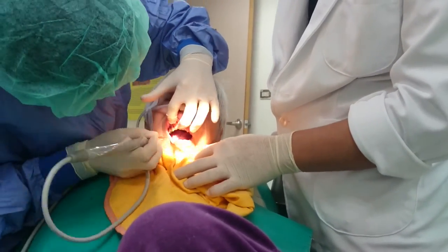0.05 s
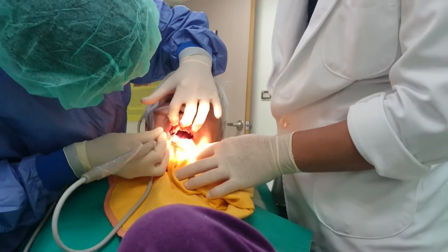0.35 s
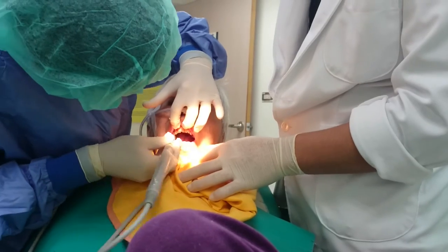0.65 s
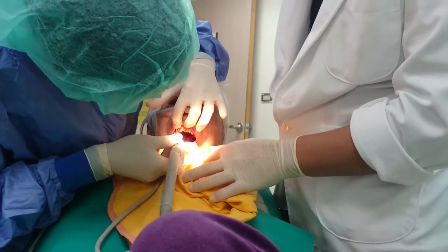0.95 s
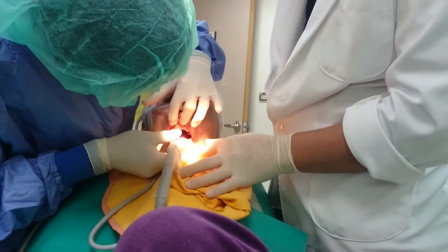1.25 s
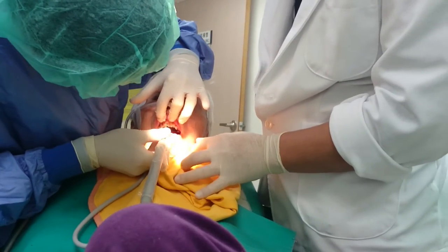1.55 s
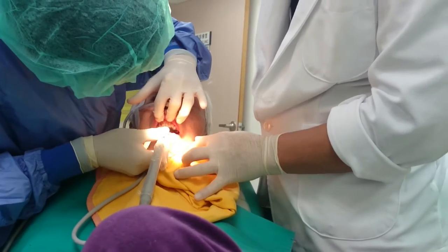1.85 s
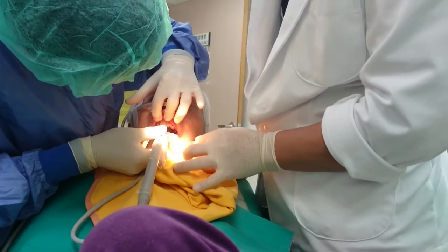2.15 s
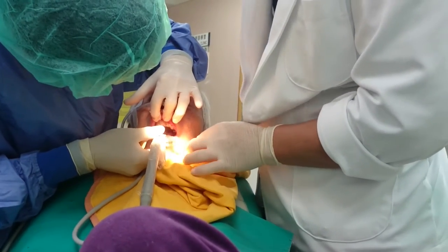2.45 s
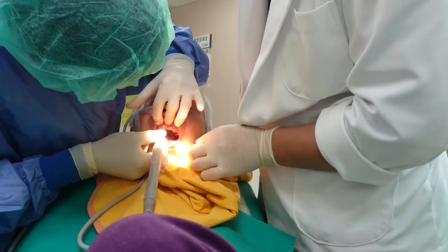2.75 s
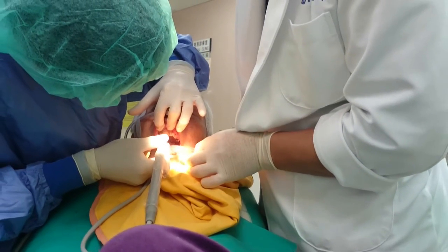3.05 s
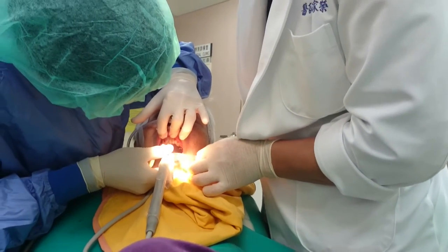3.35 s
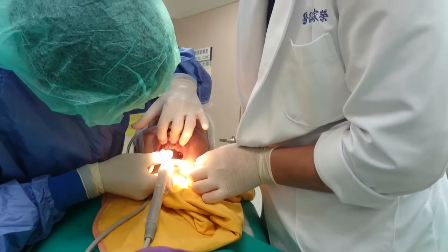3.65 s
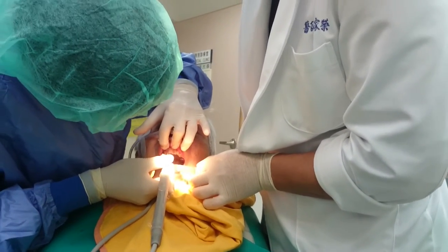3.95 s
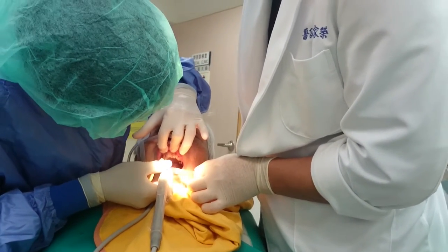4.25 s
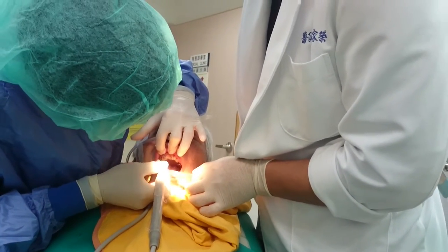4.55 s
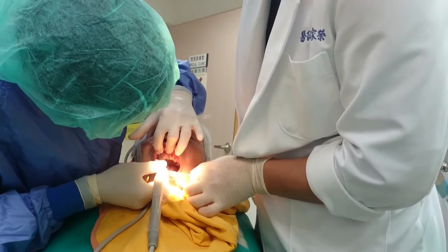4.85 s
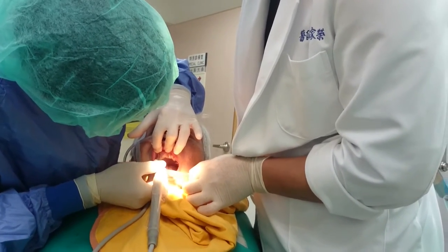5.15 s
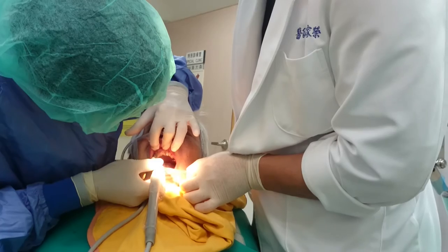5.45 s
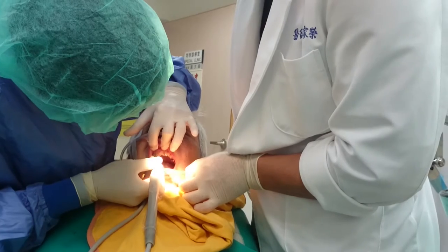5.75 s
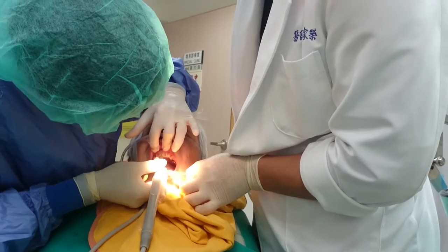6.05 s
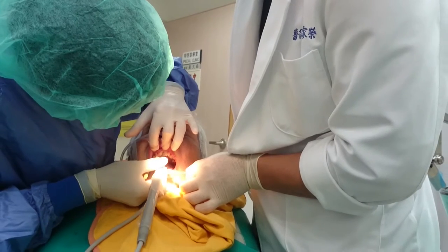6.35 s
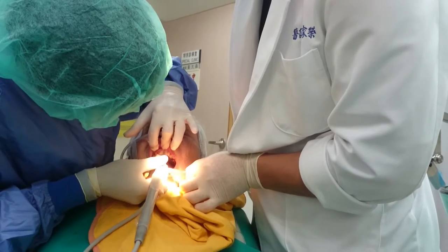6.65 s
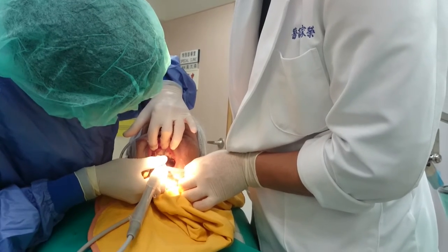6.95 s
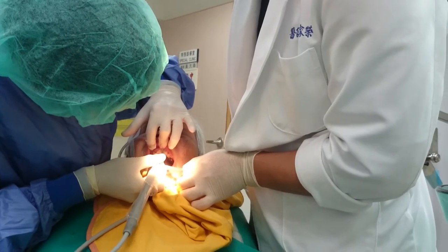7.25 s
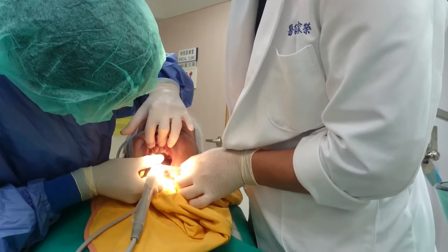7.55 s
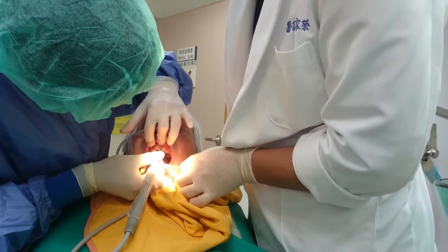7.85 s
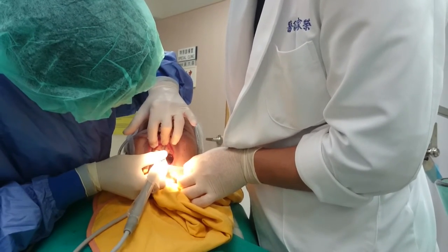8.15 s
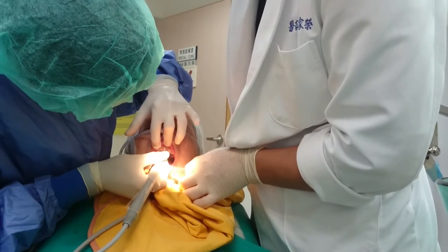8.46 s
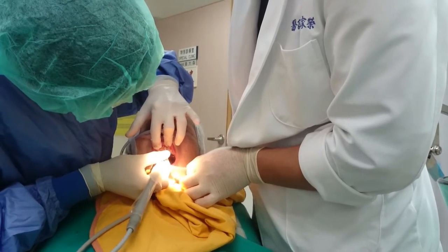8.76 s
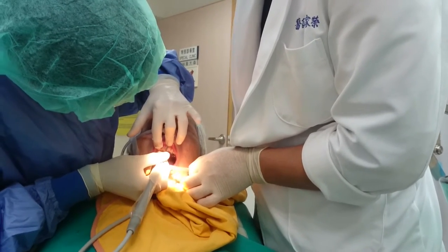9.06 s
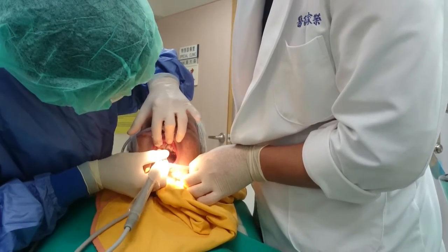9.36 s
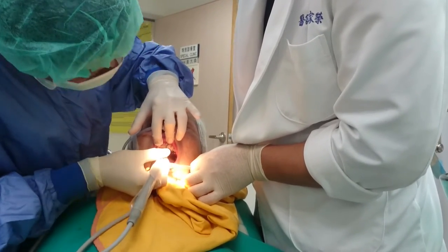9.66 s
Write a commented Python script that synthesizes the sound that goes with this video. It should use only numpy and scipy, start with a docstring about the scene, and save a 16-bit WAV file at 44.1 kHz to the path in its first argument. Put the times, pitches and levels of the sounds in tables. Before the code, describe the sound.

A dental suction tube hisses and whistles on its own at first. Then a very high scaler whine cuts in with hissing spray, broken by short scrapes and squeaks on the teeth. As water pools in the mouth, the tube gurgles, fizzes and slurps, carrying on when the whine cuts off at the very end. The stereo microphone is close to the chair in a small, faintly humming treatment room.

```python
"""An ultrasonic scaler cleaning teeth, close to a stereo microphone in a small dental surgery.
It whines as its tip skips on the teeth, rasps at half its pitch when pressed, squeaks as it slides
and throws off a hissing mist of water. Beside it a suction tube first draws plain air, then slurps
and crackles as the water pools in the mouth. Equipment hums in the room behind."""
import sys
import numpy as np
from scipy import signal
from scipy.fft import rfft, irfft, next_fast_len
from scipy.io import wavfile
from scipy.ndimage import uniform_filter1d, map_coordinates

SR = 44100
rng = np.random.default_rng(int(sys.argv[2]) if len(sys.argv) > 2 else 0)


def unload_wav(signal):
    """Save mono or channel-first audio to the path in sys.argv[1] as 16-bit WAV at rate SR, clipped to [-1, 1]."""
    wavfile.write(
        sys.argv[1],
        SR,
        np.round(np.clip(np.atleast_2d(signal).T, -1, 1) * 32767).astype(np.int16),
    )


N = 437472
TIP_HZ, SCALER_ON_S, SCALER_OFF_S = 11910, 1.66, 9.7
WET_S = 2.83  # water reaches the tube

# The tip pressed on a tooth. Each row: start in seconds, length in seconds, relative level in dB.
SCRAPES = [(1.66, 0.088, -34), (1.76, 0.02, -19), (2.23, 0.021, -23), (2.41, 0.092, -26.8),
           (2.87, .06, -30.5), (3.235, 0.03, -15.5), (3.57, 0.024, -23.5), (3.81, .05, -20),
           (3.94, 0.029, -19.5), (4.02, 0.022, -22), (4.52, 0.049, -25), (4.765, 0.062, -18),
           (5.06, 0.085, -19.5), (5.5, 0.079, -22), (5.705, .04, -20.5), (5.82, 0.033, -23),
           (5.95, 0.038, -21), (6.255, 0.057, -19.5), (6.56, .05, -27.5), (6.935, 0.028, -14),
           (7.001, .007, -14), (7.044, .035, -18.5), (7.22, 0.082, -18.5), (7.54, 0.031, -19),
           (7.71, 0.057, -23.5), (7.96, 0.057, -18.5), (8.09, 0.03, -21.5), (8.42, 0.044, -18),
           (8.458, 0.06, -17), (8.63, 0.089, -19), (8.83, 0.038, -22), (9.0, 0.068, -20.5),
           (9.09, 0.024, -19.5), (9.22, .07, -27), (9.332, 0.041, -24), (9.49, .05, -25), (9.8, .06, -35)]
# The tip sliding. Each row: start and length in seconds, first, middle and last pitch in Hz,
# relative levels of the squeak and of its sidebands in dB.
SLIDES = [(3.953, 0.078, 6150, 6350, 6110, -22, -29), (4.118, 0.087, 6250, 6450, 6100, -24, -28),
          (4.268, 0.074, 6650, 6380, 5900, -23, -25), (4.363, 0.057, 6600, 6270, 6100, -27, -35),
          (5.445, 0.08, 6500, 6320, 6000, -23, -32), (5.687, 0.04, 6600, 6400, 6300, -23.5, -31),
          (5.819, 0.048, 6600, 6120, 6000, -22, -40), (6.309, 0.06, 6400, 6600, 6300, -31, -34.5),
          (6.564, 0.064, 6500, 6320, 6100, -28, -32), (6.923, 0.017, 6450, 6440, 6450, -30.5, -15),
          (6.956, 0.061, 6250, 6550, 6040, -24, -29), (7.032, 0.023, 6600, 6430, 6160, -24, -27.6),
          (7.912, 0.041, 6200, 6500, 6600, -28.5, -25), (8.02, 0.073, 6850, 6460, 6470, -22, -33),
          (9.071, 0.053, 6650, 6240, 6240, -21.5, -27), (9.22, 0.061, 5300, 5460, 5620, -20.5, -42)]


def amp(db):
    """Decibels to gain."""
    return 10 ** (np.asarray(db) / 20)


def unit(x):
    """Scale to rms 1."""
    return x / np.sqrt(np.mean(np.abs(x) ** 2) + 1e-20)


def clock():
    """The time of each sample in seconds."""
    return np.arange(N) / SR


def elapsed(start):
    """Seconds since a moment, 0 before it."""
    return np.maximum(clock() - start, 0)


def along(points, hz):
    """(Hz, value) points read on a log axis."""
    knots_hz, values = np.transpose(points)
    return np.interp(np.log(hz + 1), np.log(knots_hz + 1), values)


def curves(rows):
    """One value per sample for each column after the time."""
    times, *columns = np.transpose(rows)
    return [np.interp(clock(), times, column) for column in columns]


def gate(start, end, edge):
    """1 between two times, with ramps of edge seconds."""
    t = clock()
    return np.clip(np.minimum(t - start, end - t) / edge + .5, 0, 1)


def wobble(rate):
    """A smooth random curve, rate knots a second."""
    return map_coordinates(rng.standard_normal(int(N * rate / SR) + 4), [clock() * rate])


def noise():
    """Two unrelated white noises."""
    return rng.standard_normal((2, N))


def filtered(x, response):
    """x times a response of frequency."""
    size = next_fast_len(N + 8192)
    return irfft(rfft(x, size) * response(np.fft.rfftfreq(size, 1 / SR)), size)[..., :N]


def placed(x, pan_db):
    """Lean a sound to the left by pan_db, keeping its power."""
    left, right = np.broadcast_to(x, (2, N))
    g = amp(pan_db)
    return np.array([g * left, right]) * np.sqrt(2 / (1 + g * g))


def akin(pair, coherence):
    """Blend two unrelated signals so that left and right are partly alike."""
    angle = np.arccos(np.clip(coherence, 0, 1)) / 2
    mid, side = np.cos(angle) * pair[0], np.sin(angle) * pair[1]
    return np.array([mid + side, mid - side])


def coloured(pair, colour):
    """Two unrelated signals become a stereo sound of rms 1 with a spectrum of (Hz, dB) points."""
    # Likeness of left and right at the microphone. Each row: frequency in Hz, coherence.
    likeness = [(60, 0.99), (600, .8), (1400, 0.15), (3000, 0.33), (4500, 0.21), (6000, 0.36), (7500, .25),
                (10000, 0.39), (12000, 0.26), (15000, 0.32)]

    def gains(hz):
        angle = np.arccos(np.clip(along(likeness, hz), -1, 1)) / 2
        return amp(along(colour, hz)) * [np.cos(angle), np.sin(angle)]
    mid, side = filtered(pair, gains)
    return unit(np.array([mid + side, mid - side]))


def leaned(x):
    """The hiss leans left or right by frequency, mostly right near 6, 7 and 15 kHz."""
    # Balance at the microphone. Each row: frequency in Hz, left over right in dB.
    balance = [(2000, -1), (4500, 4), (5900, -13), (7300, -9), (9000, -1), (10200, -5.5), (11400, 2),
               (12600, -2), (13800, -10.5), (15600, -24)]

    def gains(hz):
        g = amp(along(balance, hz))
        return np.array([g, np.ones_like(g)]) * np.sqrt(2 / (1 + g * g))
    return filtered(x, gains)


def ringing(x, hz, width_hz):
    """x through a steep (doubled) resonance whose centre may move; rms 1."""
    carrier = np.exp(2j * np.pi * np.cumsum(np.broadcast_to(hz, N)) / SR)
    pole = np.exp(-np.pi * width_hz / SR)
    return unit((signal.lfilter([1], np.poly([pole, pole]), x / carrier) * carrier).real)


def hollowed(x, hz, width_hz, depth):
    """x with a moving band cancelled, as by the reflection from a cavity."""
    carrier = np.exp(2j * np.pi * np.cumsum(hz) / SR)
    pole = np.exp(-np.pi * width_hz / SR)
    band = signal.lfilter([1 - pole], [1, -pole], x / carrier) * carrier
    return x - depth * 2 * band.real


def spatter(rate, life_s, spread_db, share):
    """Bursting droplets: brief puffs of uneven size, taking a share of the power of a steady rush."""
    bursts = (rng.random(N) < rate / SR) * amp(spread_db * np.clip(rng.standard_normal(N), -2, 2)) ** 2
    power = signal.lfilter([1], [1, -np.exp(-1 / (life_s * SR))], bursts)
    return noise() * np.sqrt(1 - share + share * power / power.mean())


def walls(x, t60):
    """The short diffuse answer of the surgery's walls, different left and right."""
    t = np.arange(SR // 3) / SR
    tail = rng.standard_normal((2, len(t))) * amp(-60 * t / t60)
    return signal.fftconvolve(x[None], tail / np.linalg.norm(tail[0]), axes=1)[:, :N]


def surgery():
    """Room tone: a wavering equipment hum, low ventilation noise and one soft bump."""
    # Equipment hum. Each row: frequency in Hz, relative level in dB.
    partials = [(59.5, -65.5), (120, -86), (198, -74.5), (310, -71.5), (576, -71)]
    # Ventilation noise. Each row: frequency in Hz, relative level in dB.
    vent_colour = [(20, 8), (60, -11), (130, 9), (300, -4), (700, -30), (2000, -7)]
    t = clock()
    hum = 0
    for hz, db in partials:
        peak = amp(db + 2.4 * wobble(8)) * np.sqrt(2)
        hum += peak * np.sin(2 * np.pi * hz * (t + .0004 * wobble(14)))
    # turned down about 5 dB by the recorder as the scaler starts
    hum *= amp(5.3 * gate(-1, 1.78, 0.079) - 1.0)
    vent = amp(-60.5) * coloured(noise(), vent_colour)
    bump_time = (t - 4.492) / .003
    bump = amp(-33.5) * bump_time * np.exp(-bump_time ** 2)
    return placed(hum, pan_db=-6) + vent + bump


def suction_air():
    """Dry air hisses and whistles into the tube; the whistles fade once it lies in the wet mouth."""
    # The draw of air. Each row: time in seconds, relative level in dB.
    draw = [(0, -34), (.27, -35), (.52, -37.5), (.8, -36.5), (1.13, -39), (1.27, -36), (1.6, -39)]
    # Its hiss. Each row: frequency in Hz, relative level in dB.
    air_colour = [(120, -17), (250, -20.5), (450, -16.5), (700, -15), (1200, -8.5), (2100, -7), (2800, -8),
                  (3400, -3), (5200, -9), (6400, 5.5), (8000, -5), (9800, -17), (11600, -8), (13400, -6.5),
                  (15600, 0.5)]
    # Tube resonances. Each row: centre and width in Hz, relative level and left over right in dB.
    tube_modes = [(1284, 41, -22, -4), (1540, 58, -23, 17), (1770, 94, -29.5, -11), (3083, 39, -24.5, -9),
                  (3438, 85, -10, -0.5), (4050, 560, -8.5, 4), (4940, 380, -10.5, 2), (5870, 520, 1, -14),
                  (7220, 940, -8.5, -25)]
    air_db, = curves(draw)
    flow = spatter(rate=400, life_s=0.004, spread_db=5, share=0.3)
    hiss = leaned(coloured(flow, air_colour)) * amp(air_db + 5.5 - 3.3 * gate(1.95, np.inf, .2))
    # the upper resonances rise as the tube is pushed closer to the cheek
    rise = 0.037 * (np.clip(clock() / .9, 0, 1) - .5)
    whistles = 0
    for hz, width_hz, db, pan_db in tube_modes:
        centre_hz = hz * (1 + rise * (hz > 4500))
        level = amp(db + 0.67 * wobble(5.14))
        whistles += placed(level * ringing(akin(noise(), coherence=0.3), centre_hz, width_hz), pan_db)
    fade_db = 7 * gate(1.72, np.inf, .15)
    return hiss + whistles * amp(air_db + 3.0 - fade_db)


def gurgle(hollow_hz):
    """Churning water rings the mouth, which hoots when the gap between tube and cheek is narrow."""
    # The churn. Each row: frequency in Hz, relative level in dB.
    churn_colour = [(100, -24), (300, -11.5), (470, -15.5), (560, -1.5), (700, -1.5), (830, -3.5),
                    (1420, -4), (1560, 4.5), (1740, 4.5), (1850, -5), (2100, -2), (2650, -14), (3300, -1),
                    (4000, 4), (5000, -16.5)]
    # Narrow resonances of mouth and tube. Each row: centre in Hz, width in Hz, boost in dB.
    modes = [(410, 24, 6.5), (702, 23, 4.5), (890, 38, 2), (1050, 28, 5), (1514, 32, 5), (1794, 42, 4),
             (1895, 24, 8), (2052, 15, 6.5), (2510, 39, 8.5), (3046, 17, 10), (3430, 52, 11)]

    def resonances(f):
        return amp(sum(db * np.exp(-((f - hz) / width_hz) ** 2) for hz, width_hz, db in modes))
    churn = spatter(rate=240, life_s=0.004, spread_db=-1, share=0.7)
    mouth = unit(filtered(coloured(churn, churn_colour), resonances))
    narrowness = np.interp(hollow_hz, [3240, 4460], [0, 1])  # a narrower gap cancels a higher band
    hoot = ringing(akin(noise(), coherence=0.44), hz=1559, width_hz=77)
    return mouth + narrowness * amp(-10.5) * hoot


def slurp(slurp_db, hollow_hz):
    """Drops fizz and ring the tube's opening, left of centre; the gap beside it shifts like a vowel."""
    # The range in which the gap can ring. Each row: frequency in Hz, relative gain in dB.
    gap_colour = [(2600, -28.5), (3350, -1), (4300, 7), (5000, -28)]
    # The fizz of the drops. Each row: frequency in Hz, relative level in dB.
    fizz_colour = [(7000, -27), (8800, -7), (9600, -7), (10150, 5), (10650, -6), (11400, -11), (12700, -15),
                   (15700, -6.5)]
    drops = spatter(rate=260, life_s=0.0028, spread_db=2.5, share=0.6)
    stream = akin(drops, coherence=0.44)
    opening = ringing(stream, hz=4580, width_hz=500) * amp(slurp_db + 1.5 + 2.6 * wobble(21))
    # the gap rings either side of the cancelled band and partly follows the slurp's swells
    gap = sum(ringing(stream, hollow_hz + offset_hz, width_hz=640) for offset_hz in (-845, 1013))
    gap = unit(filtered(gap, lambda hz: amp(along(gap_colour, hz))))
    gap *= amp(-33 + 0.39 * (slurp_db - slurp_db.mean()))
    fizz = coloured(drops, fizz_colour) * amp(slurp_db - 3.0)
    return placed(opening + gap, pan_db=6.5) + placed(fizz, pan_db=4.0)


def suction_water(hollow_hz):
    """Water enters the tube in uneven gulps and tears into drops, gurgling and slurping."""
    # Water in the tube. Each row: time in seconds, relative levels of gurgle and slurp in dB.
    water = [(2.88, -42, -42), (3.35, -41.5, -41), (3.37, -38.5, -35), (3.7, -39, -26), (3.74, -39, -32.5),
             (4.11, -41, -34), (5.25, -40, -30), (5.82, -38, -26), (7.12, -41, -30.5), (7.55, -40, -23.5),
             (7.82, -39, -30.5), (7.86, -38.5, -28.5), (8.57, -42, -30.5), (9.92, -39.5, -32)]
    gulps_db = wobble(14)
    gurgle_db, slurp_db = np.array(curves(water)) + gulps_db
    mouth = placed(gurgle(hollow_hz) * amp(gurgle_db + 6.0), pan_db=-1.0)
    return gate(WET_S, np.inf, 0.1) * (mouth + slurp(slurp_db, hollow_hz))


def sizzle():
    """Water sizzles between tip and tooth, off to the right, swelling ever faster as it pools."""
    # The sizzle. Each row: frequency in Hz, relative level in dB.
    sizzle_colour = [(3000, -39), (4900, -10), (5500, -3), (5930, 6), (6300, -6.5), (6800, -9.5),
                     (7800, -17), (9000, -19.5)]
    pooled = elapsed(WET_S) / (N / SR - WET_S)
    level_db = -27.5 + 7 * pooled ** 3.35 + 2.16 * wobble(25) + 2.4 * wobble(6)
    drops = coloured(spatter(rate=200, life_s=0.0016, spread_db=6.5, share=0.38), sizzle_colour)
    return placed(drops * amp(level_db) * gate(WET_S, np.inf, .033), pan_db=-10.0)


def mist(press, lift):
    """The running tip shatters its cooling water into a fine hiss, more of it when pressed on a tooth."""
    # Water thrown off the tip. Each row: time in seconds, relative level in dB.
    spray = [(1.7, -29.5), (2.48, -32), (3.82, -26), (4.26, -31.5), (4.73, -26.5), (8.07, -29),
             (9.7, -25.5)]
    # Its hiss. Each row: frequency in Hz, relative level in dB.
    mist_colour = [(1500, -34.5), (3500, -10), (4500, -6), (6000, -0.5), (7200, -5), (8700, -7.5),
                   (10050, 0.5), (10650, -4.5), (11400, 2.5), (12200, -4.5), (12900, 5), (13400, -5.5),
                   (13800, 3.5), (14500, -1.5), (15600, 6.5)]
    run_on_s, fade_db_per_s = 0.041, 109  # the water outlasts the tip a little
    fade_db = fade_db_per_s * elapsed(SCALER_OFF_S + run_on_s)
    mist_db, = curves(spray)
    mist_db += 0.5 * press - 1.5 * lift - fade_db + 1.2 * wobble(20)
    droplets = coloured(spatter(rate=1200, life_s=0.00088, spread_db=-1.0, share=0.14), mist_colour)
    return leaned(droplets * amp(mist_db + 10.0) * gate(SCALER_ON_S, np.inf, 0.0068))


def pressure():
    """How hard the tip presses, and how far it lifts after a scrape or while it slides (1 = full)."""
    full_press_db, lift_s, slide_lift = -20.5, 0.095, 0.41
    press, lift = 0, 0
    for start, length, db in SCRAPES:
        force = amp(db - full_press_db)
        end = start + length
        press = np.maximum(press, force * gate(start, end, .011))
        lift = np.maximum(lift, force * gate(end, end + lift_s, .016))
    for start, length, *_ in SLIDES:
        lift = np.maximum(lift, slide_lift * gate(start, start + length, .015))
    return press, lift * np.clip(1 - press, 0, 1)


def skipping(rate, blur_s):
    """Complex swing of the tip: each skip on the tooth throws its phase by about half a cycle."""
    skips = rng.random(N) < rate / SR
    phase = np.cumsum(skips * (np.pi + 0.67 * rng.standard_normal(N)))
    pole = np.exp(-1 / (blur_s * SR))
    return unit(signal.lfilter([1 - pole], [1, -pole], np.exp(1j * phase)))


def squeaks():
    """Sliding detunes the tip's half-pitch tone; twice the offset sounds on both sides of the whine."""
    tracks = np.zeros((2, N + SR))
    for start, length, first_hz, middle_hz, last_hz, squeak_db, side_db in SLIDES:
        progress = np.linspace(0, 1, max(int(length * SR), 8))
        onset, n = int(start * SR), len(progress)
        hz = np.polyval(np.polyfit([0, .5, 1], [first_hz, middle_hz, last_hz], 2), progress)
        jitter = unit(uniform_filter1d(rng.standard_normal(SR // 4), size=60))[:n]
        half_phase = 2 * np.pi * np.cumsum(hz + 85 * jitter) / SR
        mirror_phase = 2 * np.pi * TIP_HZ * np.arange(n) / SR - half_phase
        squeak = amp(squeak_db) * (np.sin(half_phase) + amp(-18) * np.sin(mirror_phase))
        sidebands = amp(side_db) * (np.sin(2 * half_phase) + np.sin(2 * mirror_phase))
        envelope = np.abs(np.sin(np.pi * progress)) ** 0.25
        tracks[:, onset:onset + n] += np.array([squeak, sidebands]) * envelope
    squeak, sidebands = tracks[:, :N]
    echo = amp(-9) * walls(squeak + sidebands, t60=.15)
    return placed(amp(3.0) * squeak, pan_db=-17.0) + placed(amp(1.5) * sidebands, pan_db=-7) + echo


def rasp():
    """Pressed hard, the tip strikes on every other swing: a rough tone an octave down, and a rattle."""
    # The rattle on the tooth. Each row: frequency in Hz, relative level in dB.
    rattle_colour = [(1000, -70), (3000, -46), (4500, -20), (5300, -6), (5750, -0.5), (5960, 6),
                     (6200, -5.5), (6600, -17), (8000, -55.5)]
    level = sum(amp(db) * gate(start, start + length, 0.025) for start, length, db in SCRAPES)
    half_tone = (skipping(rate=330, blur_s=0.00065) * np.exp(1j * np.pi * TIP_HZ * clock())).real
    rattle = coloured(spatter(rate=300, life_s=0.0025, spread_db=4.5, share=0.82), rattle_colour)
    return placed(level * (amp(-2.5) * rattle + amp(1.2) * half_tone), pan_db=-10.5)


def tick():
    """The tip ticks as it first starts to swing."""
    burst = coloured(noise(), [(150, -8.5), (400, -11), (2500, 2), (7000, -1), (14000, -20)])
    return amp(-35.0) * gate(SCALER_ON_S, SCALER_ON_S + 0.019, 0.0033) * burst


def whine(press, lift):
    """The tip's piercing tone, chopped by skips that crowd together at the start and under pressure."""
    # The hand's way round the mouth. Each row: time in seconds, relative level and left over right in dB.
    path = [(1.8, -16.5, -2), (2.04, -19, -5), (2.92, -19.5, -8.5), (3.68, -21.5, 4.5), (3.83, -20, 2),
            (5.26, -23.5, 4), (6.83, -20.5, 4.5), (6.97, -22.5, 1), (7.45, -22.5, 2), (7.67, -20.5, 0),
            (8.76, -24.5, 2.0), (9.02, -21.5, 1.5), (9.66, -24, 2)]
    swing_up_s, run_down_db_per_s = .04, 150
    level_db, pan_db = curves(path)
    level_db += 1.5 * press - 0.5 * lift - run_down_db_per_s * elapsed(SCALER_OFF_S)
    swing_up = 1 - np.exp(-elapsed(SCALER_ON_S) / swing_up_s)
    skips_per_s = 60 + 170 * press + 500 * gate(1.6, 1.79, .06)
    swing = skipping(skips_per_s, blur_s=0.00058) * amp(1.19 * wobble(50) + 1.56 * wobble(600))
    carrier = np.exp(2j * np.pi * TIP_HZ * clock())
    tone = (swing * carrier).real * amp(level_db + 5.0) * swing_up
    # the moving hand shades each side of the microphone in turn
    direct = np.array([tone * amp(1.5 * wobble(13)), tone * amp(1.1 * wobble(22))])
    return placed(direct, pan_db) + amp(-15) * walls(tone, t60=.22)


def scene():
    """At the chair, scaler and suction work side by side; the mouth's cavity hollows out their hiss."""
    # The band cancelled by the shifting gap between tube and cheek. Each row: time in seconds, centre in Hz.
    hollow = [(2.85, 3200), (3.3, 3040), (3.55, 4100), (3.85, 3420), (4.65, 3300), (4.85, 4380),
              (5.3, 4270), (5.8, 4100), (6.25, 3240), (6.98, 3200), (7.1, 4280), (7.72, 4140), (7.92, 3410),
              (9.25, 3576), (9.52, 4230), (9.92, 4800)]
    hollow_hz, = curves(hollow)
    press, lift = pressure()
    hiss = mist(press, lift) + sizzle() + suction_air() + suction_water(hollow_hz)
    hiss = hollowed(hiss, hollow_hz, width_hz=195, depth=gate(WET_S, np.inf, 0.19))
    return whine(press, lift) + rasp() + tick() + squeaks() + hiss + surgery()


def record(dry):
    """Sound reaches the microphone's two ports out of step; peaks are rounded and the top is cut off."""
    # How far the left port leads the right. Each row: frequency in Hz, phase in radians.
    port_lead = [(100, .1), (1100, .3), (1400, 0.87), (2000, 1.88), (2500, 0.24), (4100, 1.6), (5000, 0.45),
                 (6100, 2.23), (7500, 4.7), (9300, 5.3), (11000, 6.3), (12000, 5.6), (15700, 10)]
    ceiling, top_hz = .97, 15800
    ports = filtered(dry, lambda hz: np.exp(.5j * np.outer([1, -1], along(port_lead, hz))))
    rounded = ports / (1 + (ports / ceiling) ** 30) ** (1 / 30)
    return filtered(rounded, lambda hz: hz < top_hz)


dry = scene()
out = record(dry)
unload_wav(out)
```